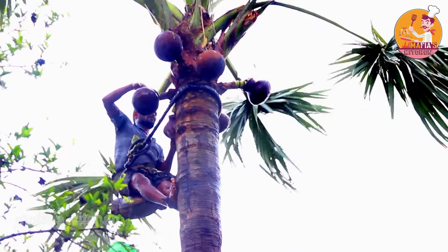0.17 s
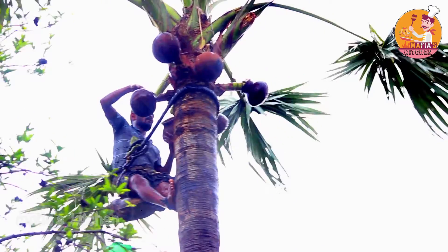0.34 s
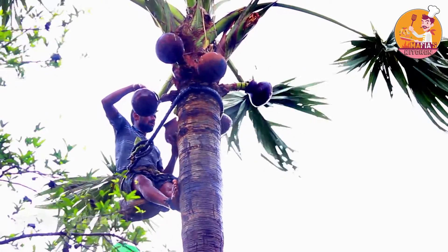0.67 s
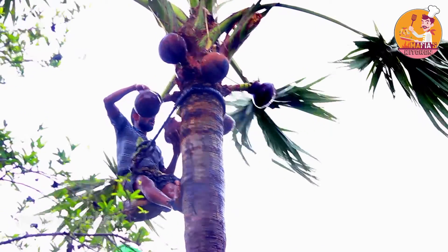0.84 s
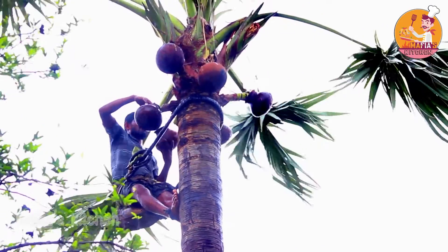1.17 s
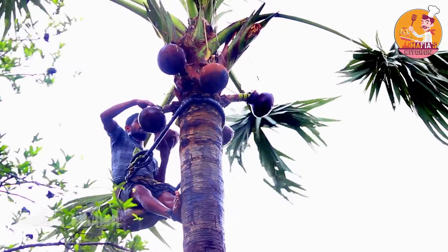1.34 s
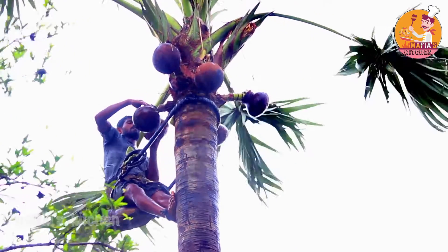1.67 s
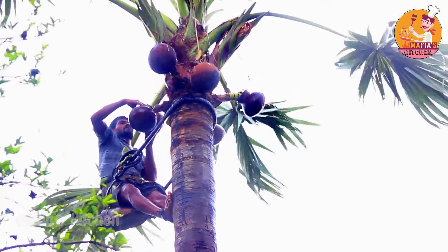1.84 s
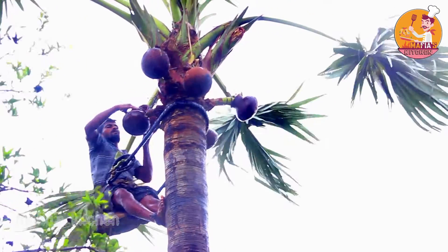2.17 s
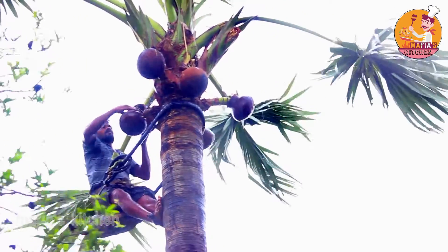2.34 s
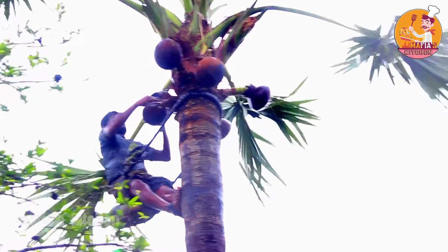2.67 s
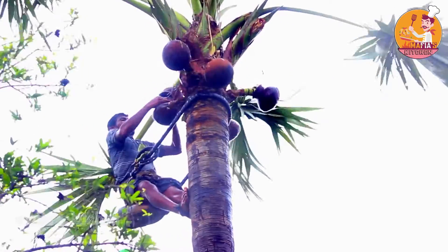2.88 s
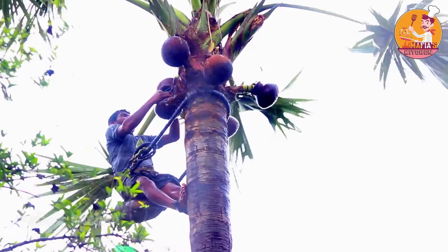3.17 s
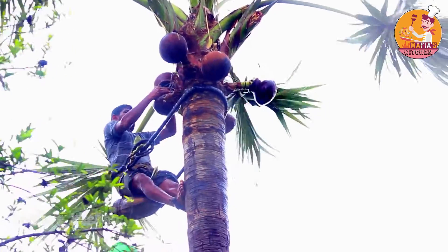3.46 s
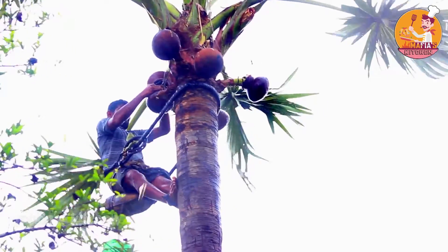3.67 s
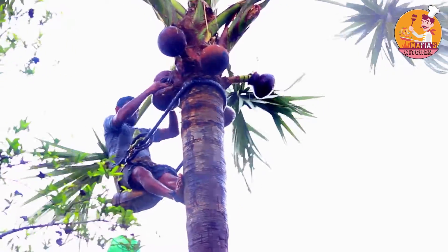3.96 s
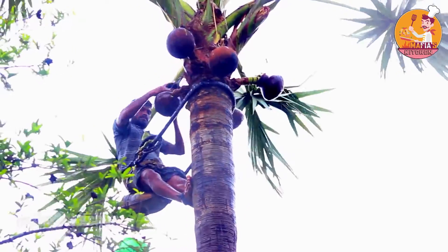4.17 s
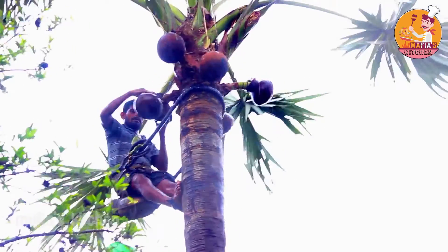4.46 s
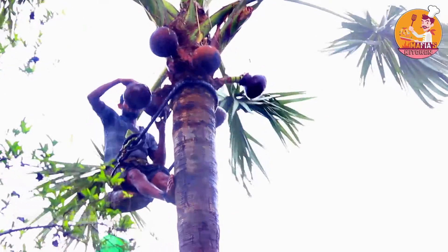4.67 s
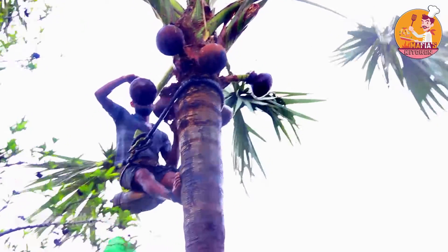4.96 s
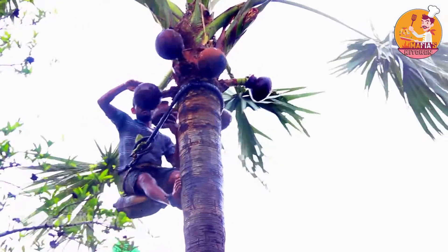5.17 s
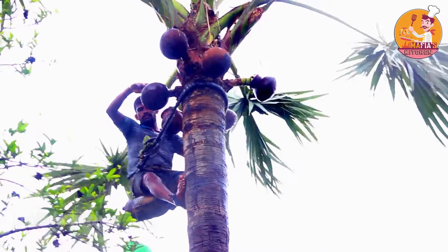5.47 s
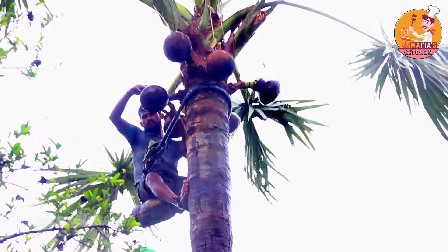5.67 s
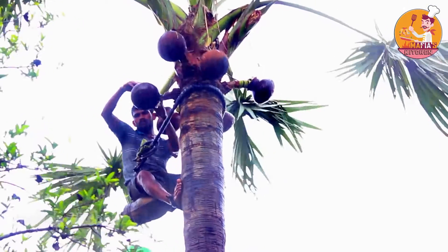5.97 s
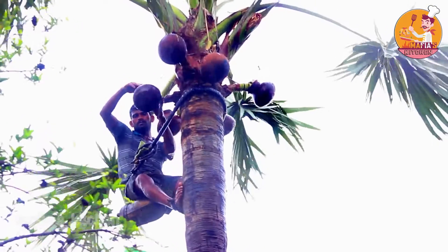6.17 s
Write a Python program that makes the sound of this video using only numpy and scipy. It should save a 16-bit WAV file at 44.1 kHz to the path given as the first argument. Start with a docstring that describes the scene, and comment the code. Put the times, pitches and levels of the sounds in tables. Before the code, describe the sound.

Steady rain patters with close splats and ticks as a long thunder roll breaks in abruptly, surges several times, then fades to a low rumble.

```python
"""Thunder over steady rain

Outdoors in the rain: far drops merge into a wash, nearer ones patter, and close by single drops splat and tick.
A long thunder roll arrives in several swells, a swarm of dulled shock waves with one echo.
A small bird peeps faintly at the start, as arched sine tones; noise gives the storm's low murmur.
Once, early on, the rain briefly dips and dulls, and the thunder's upper register dips with it."""
import sys
import numpy as np
from scipy import signal
from scipy.fft import rfft, irfft, next_fast_len
from scipy.io import wavfile
from scipy.ndimage import uniform_filter1d

SR = 44100
rng = np.random.default_rng(int(sys.argv[2]) if len(sys.argv) > 2 else 0)


def inscribe(sig):
    """Save sig as 16-bit PCM at rate SR to the path in sys.argv[1].

    A 1-D sig is mono; a 2-D sig holds one channel per row.
    Samples are clipped to [-1, 1] before scaling.
    """
    pcm = np.round(np.clip(np.atleast_2d(sig).T, -1, 1) * 32767)
    wavfile.write(sys.argv[1], SR, pcm.astype(np.int16))


N = 278712
TIME = np.arange(N) / SR

# Colour of the thunder's shocks, relative: pitch_hz, level_db (per Hz)
THUNDER_COLOUR = [(12, -37), (30, -16.5), (60, -10.5), (85, -5), (120, -1), (165, 3.5), (250, -1),
                  (320, -3.5), (420, -12), (550, -22), (800, -29.5), (1500, -52), (4000, -79)]
ECHO_DELAY_S, ECHO_GAIN = .0378, 0.39
DEEP_HZ, UPPER_HZ = 105, 290  # edges of the deep and upper registers
ARRIVAL_S, ARRIVAL_RAMP_S = .268, .012  # the first shocks arrive abruptly


def thunder(bright_db=1.0, deep_db=2.6, level_db=0.05):
    """Shocks from all along the lightning channel pile up; near stretches are bright, far ones deep."""
    roll_db, surge_bright_db, surge_deep_db = surges()
    shocks = colour(impacts(per_s=700, spread_db=3.0, range_db=11.5), THUNDER_COLOUR)
    shocks += ECHO_GAIN * np.interp(TIME - ECHO_DELAY_S, TIME, shocks, left=0)
    deep = below(shocks, DEEP_HZ)
    upper = shocks - below(shocks, UPPER_HZ)
    body = shocks - deep - upper

    # each register keeps its share of the roll, whichever shocks happen to coincide
    registers = [(deep, deep_db + surge_deep_db),
                 (body, 0),
                 (upper, bright_db + surge_bright_db + brief_dip_db())]
    balanced = np.zeros(N)
    for part, share_db in registers:
        balanced += np.std(part) * evened(part, window_s=0.079) * from_db(share_db)

    roll = evened(balanced, window_s=0.16) * from_db(roll_db + level_db)
    arrival = np.clip((TIME - ARRIVAL_S) / ARRIVAL_RAMP_S, 0, 1)
    return roll * arrival + claps()


# Surges of the roll, one for each stretch of the lightning channel, before the thunder's overall trims:
# crest_s, level_db, rise_s, fall_s (time to fall 10 dB), bright_db (extra), deep_db (extra)
CHANNEL_SURGES = [(0.32, -17, 0.035, 0.4, 2, 6.5), (0.62, -10, 0.089, 0.1, 0.5, -17),
                  (0.83, -14, 0.086, 0.05, 1.0, -4), (1.04, -14, 0.12, 0.1, 2, -11),
                  (1.31, -9.5, 0.098, 0.23, 1.5, -3), (1.47, -18, 0.051, 0.21, 4.5, 5.5),
                  (1.78, -24, 0.065, 0.45, 2.5, -2.0), (2.58, -18.5, 0.13, 0.27, 6, 1.5),
                  (3.16, -25.5, 0.18, 0.15, -14, 4.5), (3.46, -15.0, 0.1, 0.12, -7.5, -5),
                  (3.59, -16, 0.018, 0.1, -3.0, -10), (3.791, -23, 0.052, 0.1, -2, 4),
                  (3.93, -26.5, 0.032, 0.1, -5.0, 3.5), (4.22, -29, 0.0074, 0.1, 4, -22),
                  (4.729, -21.5, 0.04, 0.18, -3.5, -8), (4.88, -26.5, 0.02, 0.09, -1.0, 4),
                  (5.11, -20.0, 0.048, 0.09, -2.0, 1), (5.23, -25.0, 0.031, 0.18, 1, -7),
                  (5.69, -28.0, 0.14, 0.25, 3.5, 4), (5.82, -23.5, 0.019, 0.08, 3, -6),
                  (6.15, -32, 0.092, 0.5, -5, 1)]
LINGER_DB, LINGER_FALL_DB_PER_S = -21.5, 7  # each surge leaves a long rumble in the landscape


def surges():
    """Each surge swells, falls and lingers; powers add. Gives the roll's level, brightness and depth in dB."""
    power = bright = deep = 1e-12
    for crest_s, level_db, rise_s, fall_s, bright_db, deep_db in CHANNEL_SURGES:
        before = np.minimum(TIME - crest_s, 0)
        after = np.maximum(TIME - crest_s, 0)
        swell = np.exp(-(before / rise_s) ** 2)
        fall = from_db(-10 * after / max(fall_s, .01)) ** 2
        linger = from_db(LINGER_DB - LINGER_FALL_DB_PER_S * after) ** 2
        surge = from_db(level_db) ** 2 * swell * (fall + linger)
        power = power + surge
        bright = bright + surge * from_db(bright_db) ** 2
        deep = deep + surge * from_db(deep_db) ** 2
    return 10 * np.log10([power, bright / power, deep / power])


# Strongest single shocks within the roll, relative: push_s (near the top of the push), level_db (peak)
STRONG_SHOCKS = [(0.282, -22), (0.556, -11), (0.586, 0), (0.747, -3), (1.051, -6), (1.264, -1), (1.304, -1),
                 (2.523, -10), (3.421, -2.5), (3.573, -22), (3.913, -33), (4.692, -9), (5.099, -16)]


def claps(level_db=-5, pitch_hz=230):
    """The strongest shocks stand out as single pressure waves, thinned in the bass."""
    out = np.zeros(N)
    for s, shock_db in STRONG_SHOCKS:
        # starting 2 ms early puts the top of the push near s
        add(out, s - .002, from_db(shock_db + level_db) * n_wave(pitch_hz))
    return butter(out, 155, "high")


def n_wave(hz):
    """One push and one pull of pressure, height 1, strongest at hz."""
    phase = np.arange(-4, 4, 2 * np.pi * hz / SR)
    return -phase * np.exp((1 - phase ** 2) / 2)


# Colour of the far wash, relative: pitch_hz, level_db (per Hz)
WASH_COLOUR = [(100, -7.5), (300, 1.5), (600, 0.5), (1100, 0.5), (2000, -1), (3500, -6.5), (5000, -12),
               (7500, -16.5), (10500, -24), (15500, -27.5)]
# Colour of the nearer patter, relative: pitch_hz, level_db (per Hz)
PATTER_COLOUR = [(100, -15), (400, 0.5), (800, 2.5), (1300, 4), (2200, -3), (3600, -8), (5200, -16.5),
                 (7500, -29.5), (10500, -40), (15500, -27)]
# Colour of the fine droplets, relative: pitch_hz, level_db (per Hz)
DROPLET_COLOUR = [(500, -39), (2000, 10), (4500, 12), (8000, -12.5), (11000, -18.5), (15500, -4)]
GUST_TREBLE_DB, GUST_END_S, GUST_FADE_S = 1.24, 2.4, 2.8  # the early rain is brighter, then mellows


def rain(wash_db=-0.5, patter_db=-3.0, droplets_db=-22.5, treble_hz=3800, flutter_db=0.94, sway_db=0.35):
    """Countless far drops merge to a wash; nearer drops and fine droplets stay separate ticks, in flurries."""
    far = colour(impacts(per_s=14000, spread_db=2.0, range_db=10.5), WASH_COLOUR)
    near = colour(impacts(per_s=560, spread_db=6.0, range_db=17.5), PATTER_COLOUR)
    fine = colour(impacts(per_s=110, spread_db=5.0, range_db=17), DROPLET_COLOUR)
    wash = from_db(wash_db) * far
    patter = from_db(patter_db) * evened(near, window_s=0.073)
    droplets = from_db(droplets_db) * fine

    flurries = from_db(flutter_db * wander(46) + sway_db * wander(4.3))
    fall = (wash + patter + droplets) * flurries
    gust_treble_db = GUST_TREBLE_DB * np.clip(1 - (TIME - GUST_END_S) / GUST_FADE_S, 0, 1)
    dip_db = brief_dip_db()
    dull = below(fall, treble_hz)
    treble = (fall - dull) * from_db(gust_treble_db + dip_db)
    return (dull + treble) * from_db(rain_strength_db() + dip_db)


# Strength of the rain, with a heavier gust near the start and a lighter one later: start_s, level_db
RAIN_STRENGTH = [(0, -33), (0.5, -34), (0.94, -31), (1.15, -34), (2.1, -36), (4.4, -35.5), (4.58, -34.5),
                 (5.2, -35.4), (6.32, -35.5)]


def rain_strength_db():
    """How hard it rains at every moment, apart from the brief dip."""
    return in_time(RAIN_STRENGTH)[0]


# The sound dips and dulls briefly: start_s, level_db
BRIEF_DIP = [(0.406, 0), (0.409, -7), (0.432, -8), (0.45, -4), (0.472, 0)]


def brief_dip_db():
    """The brief dip at every moment."""
    return in_time(BRIEF_DIP)[0]


# Loudest close drops, before the close drops' overall trim: start_s, level_db (peak)
LOUD_DROPS = [(0.129, -14.5), (0.2467, -14.5), (0.353, -13), (0.378, -16), (0.4495, -19), (0.4719, -16),
              (0.478, -16), (0.6, -12.5), (0.6563, -13.5), (0.7093, -14), (0.9442, -11), (1.0032, -13.5),
              (1.3099, -14.5), (1.5269, -16.5), (1.82, -21), (2.3948, -20), (3.1961, -13), (3.654, -16),
              (3.687, -20), (4.0587, -20), (4.1517, -19), (4.2124, -18), (4.3895, -21), (4.561, -17),
              (4.665, -17.5), (4.791, -19), (4.8354, -15), (4.8926, -22), (5.5215, -18.5), (5.5646, -14.5),
              (5.9369, -13), (6.031, -15.5)]
LESSER_DROPS_PER_S, LESSER_DROP_DB, LESSER_SPREAD_DB = 12, 15.5, 1.5  # slap's peak above the rain's level
# band of a drop's slap; its top edge differs from drop to drop
SLAP_LOW_HZ, SLAP_HIGH_HZ, SLAP_SPREAD_OCTAVES = 640, 2520, 0.11
SLAP_DELAY_S = .001


def close_drops(level_db=1.0, spray_db=-15, spray_decay_s=0.0015, spray_hz=4500):
    """Each drop slaps once, a sharp push and a softer pull, and scatters a few milliseconds of spray."""
    out, age = np.zeros(N), TIME[:SR // 40]
    loud = [(s, db + level_db) for s, db in LOUD_DROPS]
    lesser = random_drops(LESSER_DROPS_PER_S, LESSER_DROP_DB, LESSER_SPREAD_DB)
    for s, db in loud + lesser:
        top_hz = SLAP_HIGH_HZ * 2 ** (SLAP_SPREAD_OCTAVES * rng.standard_normal())
        top_hz = np.clip(top_hz, 2 * SLAP_LOW_HZ, SR / 4)
        slap = butter(age == 0, [SLAP_LOW_HZ, top_hz], "band")
        slap = slap / np.max(np.abs(slap))
        spray = rms_one(butter(rng.standard_normal(len(age)), [600, spray_hz], "band"))
        spray = from_db(spray_db) * spray * np.exp(-age / spray_decay_s)
        add(out, s + SLAP_DELAY_S, from_db(db) * (slap + spray))
    return out


TICKS_PER_S, TICK_DB, TICK_SPREAD_DB = 45, 6, 0  # strength above the rain's level, less at higher pitch
TICK_LOW_HZ, TICK_HIGH_HZ = 2180, 7160


def ticks(cycles=3.2):
    """Small drops on leaves ring for a few cycles, each at a pitch of its own."""
    out, age = np.zeros(N), TIME[:SR // 100]
    for s, db in random_drops(TICKS_PER_S, TICK_DB, TICK_SPREAD_DB):
        hz = TICK_LOW_HZ * (TICK_HIGH_HZ / TICK_LOW_HZ) ** rng.random()
        ring = np.sin(2 * np.pi * hz * age) * np.exp(-age * hz / cycles)
        add(out, s, from_db(db) * np.sqrt(TICK_LOW_HZ / hz) * ring)
    return out


def random_drops(per_s, peak_db, spread_db):
    """Drops that fall at random and follow the rain's strength: rows of start_s, level_db."""
    at = np.flatnonzero(rng.random(N) < per_s / SR)
    db = rain_strength_db() + brief_dip_db() + peak_db + spread_db * rng.standard_normal(N)
    return list(zip(TIME[at], db[at]))


# Bird peeps, before the bird's overall trim: start_s, length_s, pitch_hz (top), level_db
BIRD_PEEPS = [(-0.04, .09, 3620, -39), (0.142, .085, 3700, -34), (0.322, .09, 3755, -31),
              (0.52, .11, 3700, -41), (0.74, .075, 3770, -38), (1.04, .06, 3760, -40),
              (1.31, .07, 3230, -41), (1.43, .09, 3440, -43)]
PEEP_ARCH = .05  # share by which a peep's ends lie under its top pitch


def bird(level_db=-3.0, waver_db=-3.0):
    """Nearly pure peeps that rise and fall in a shallow arch, slightly uneven in strength."""
    out = np.zeros(N)
    for s, length_s, top_hz, db in BIRD_PEEPS:
        place = np.clip(2 * (TIME - s) / length_s - 1, -1, 1)  # -1 at the peep's start, 1 at its end
        pitch_hz = top_hz * (1 - PEEP_ARCH * place ** 2)
        phase = 2 * np.pi * np.cumsum(pitch_hz) / SR
        out += from_db(db) * np.sqrt(1 - place ** 2) * np.sin(phase)
    return out * from_db(level_db + waver_db * wander(60))


# Colour of the storm's low murmur, relative: pitch_hz, level_db (per Hz)
MURMUR_COLOUR = [(15, -34), (50, -19), (130, -8.5), (280, -8.5), (450, -13.5), (900, -24.5), (3000, -79)]


def storm_murmur(level_db=-36):
    """The storm's low murmur in the background: steady noise, mostly bass."""
    return from_db(level_db) * colour(rng.standard_normal(N), MURMUR_COLOUR)


def impacts(per_s, spread_db, range_db):
    """Random clicks: many small ones, a few up to range_db stronger."""
    sizes_db = np.minimum(spread_db * rng.exponential(1, N), range_db)
    return (rng.random(N) < per_s / SR) * from_db(sizes_db) * rng.choice([-1, 1], N)


def wander(hz):
    """Slow chance, changing up to hz times a second; spread 1."""
    return rms_one(butter(rng.standard_normal(N), hz, "low"))


def colour(x, spectrum):
    """Causal (minimum-phase) filter with the given spectrum; rms 1."""
    size = next_fast_len(N + SR // 2) * 2
    hz, db = np.transpose(spectrum)
    grid = np.maximum(np.arange(size // 2 + 1) * SR / size, 1)
    gain = from_db(np.interp(np.log(grid), np.log(hz), db))
    # folding the cepstrum forward in time makes the filter causal
    cepstrum = irfft(np.log(gain))
    cepstrum[1:size // 2] *= 2
    cepstrum[size // 2 + 1:] = 0
    return rms_one(irfft(rfft(x, size) * np.exp(rfft(cepstrum)))[:N])


def evened(x, window_s):
    """Hold the short-time rms near 1."""
    size = max(int(window_s * SR), 2)
    power = uniform_filter1d(uniform_filter1d(x ** 2, size), size)
    return x / np.sqrt(power + 1e-9)


def butter(x, hz, kind, order=2):
    """Causal Butterworth filter."""
    return signal.sosfilt(signal.butter(order, hz, kind, fs=SR, output="sos"), x + 1e-18)


def below(x, hz):
    """The part of x under hz, filtered both ways to keep in step with x."""
    return butter(butter(x, hz, "low")[::-1], hz, "low")[::-1]


def in_time(rows):
    """Each column of a curve at every sample."""
    s, *columns = np.transpose(rows)
    return [np.interp(TIME, s, c) for c in columns]


def add(out, s, sound):
    """Mix a short sound in at time s."""
    at = max(round(s * SR), 0)
    out[at:at + len(sound)] += sound[:N - at]


def from_db(db):
    """Decibels to gain."""
    return 10 ** (np.asarray(db) / 20)


def rms_one(x):
    """Scale to unit rms."""
    return x / np.sqrt(np.mean(x ** 2) + 1e-20)


def scene():
    """Thunder, rain, close drops and bird over the storm's low murmur, at one microphone."""
    return (thunder() + rain() + close_drops() + ticks() + bird() + storm_murmur())[None]


def record(dry):
    """Full scale limits the peaks, then a steep filter cuts the top."""
    limited = np.clip(dry, -1, 1)
    top_cut = signal.ellip(12, .1, 80, 15650, fs=SR, output="sos")  # cut above 15650 Hz
    return signal.sosfilt(top_cut, limited)


dry = scene()
out = record(dry)
inscribe(out)
```